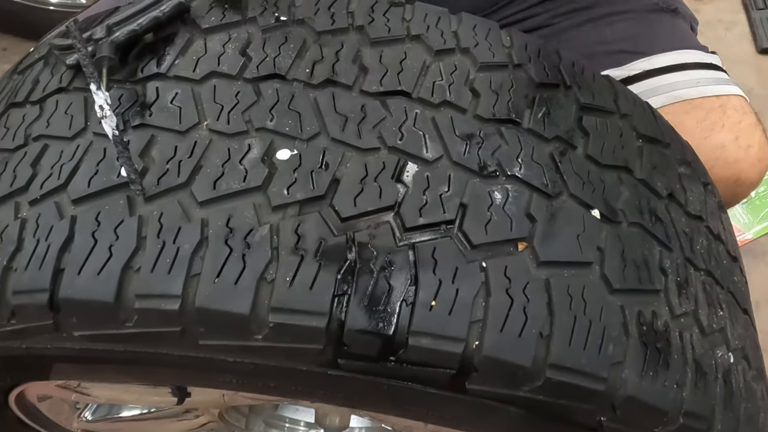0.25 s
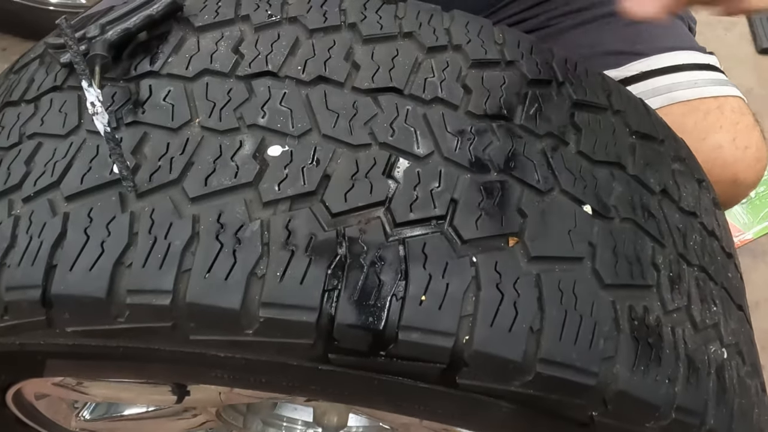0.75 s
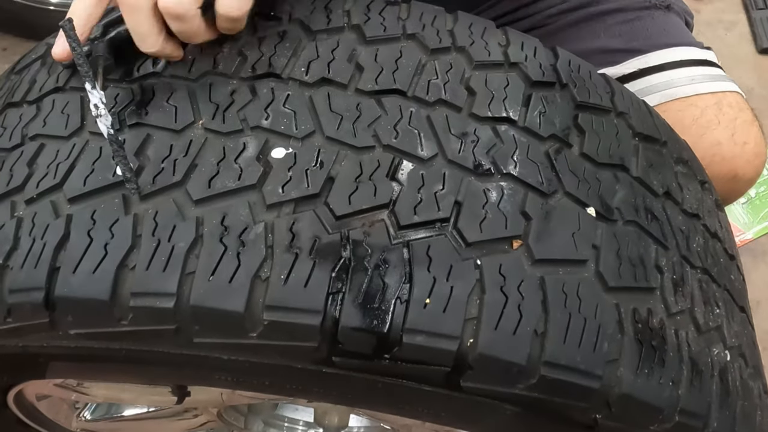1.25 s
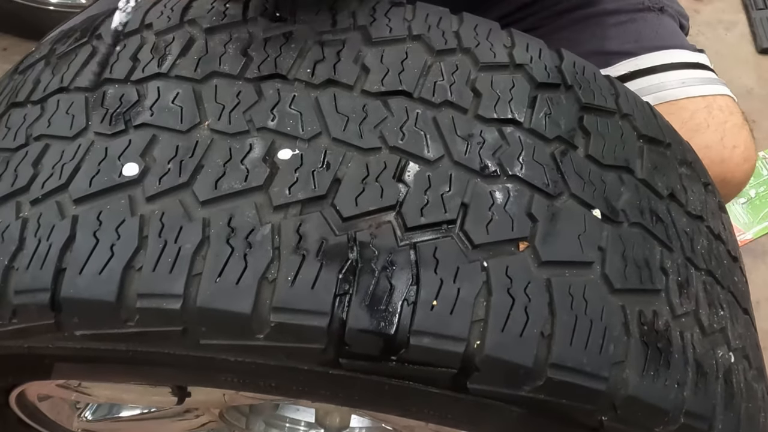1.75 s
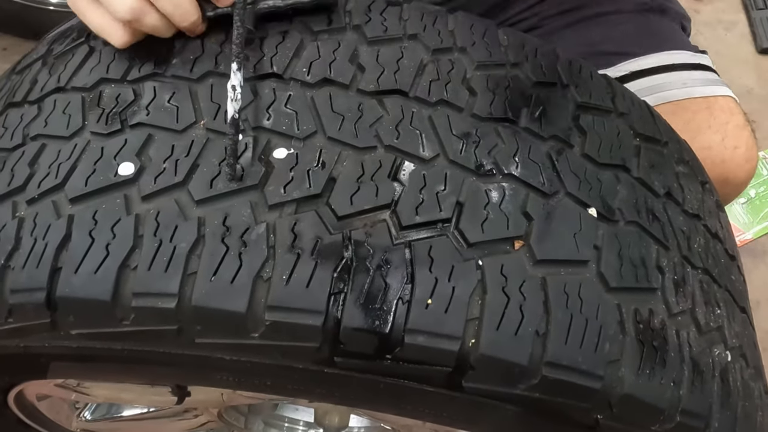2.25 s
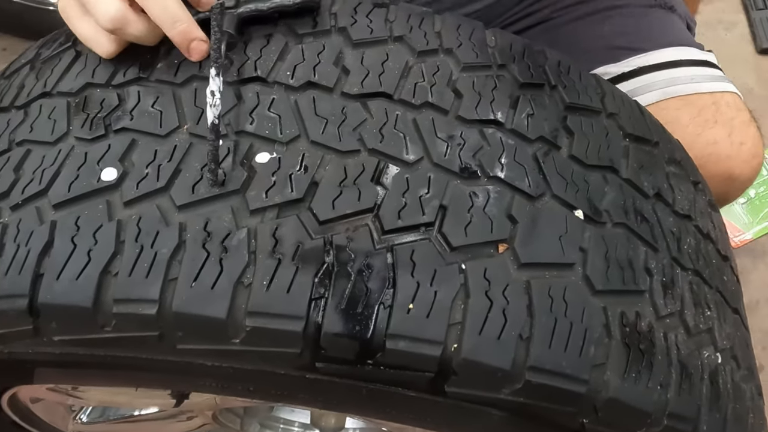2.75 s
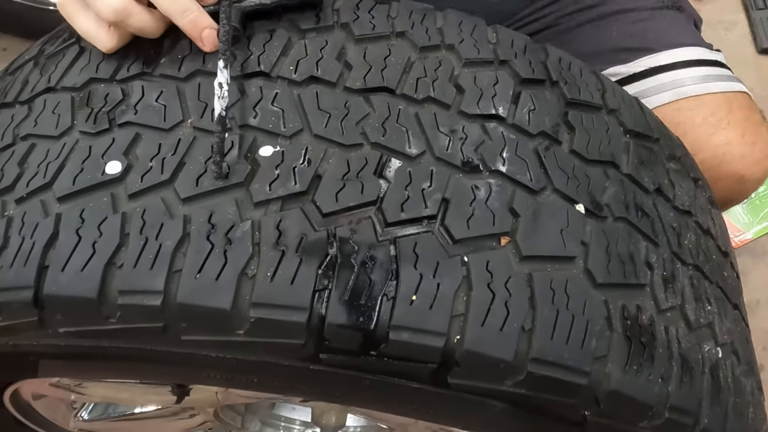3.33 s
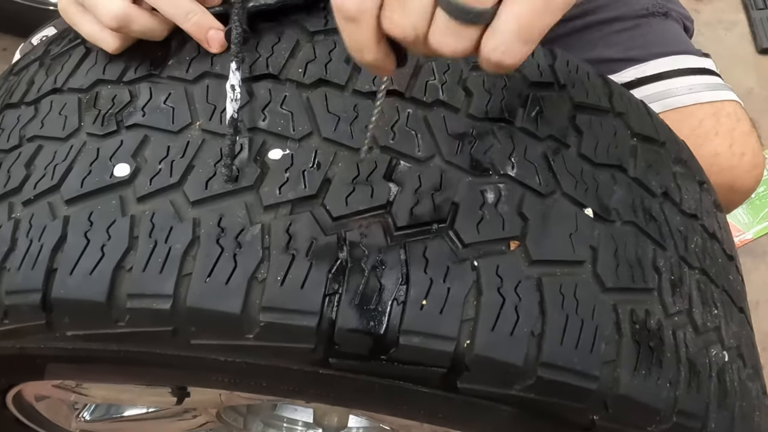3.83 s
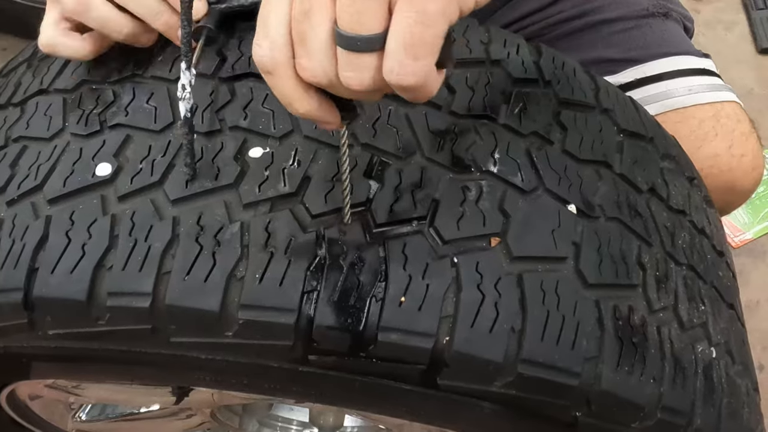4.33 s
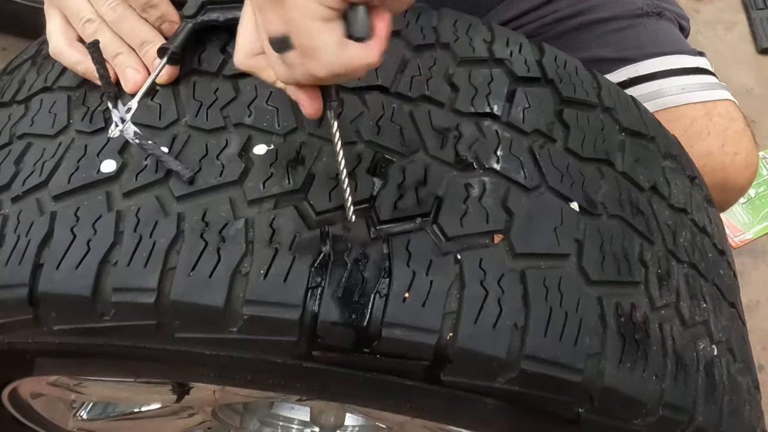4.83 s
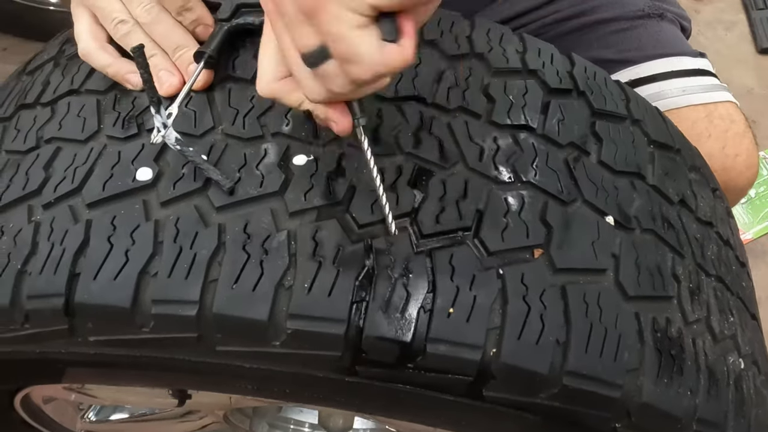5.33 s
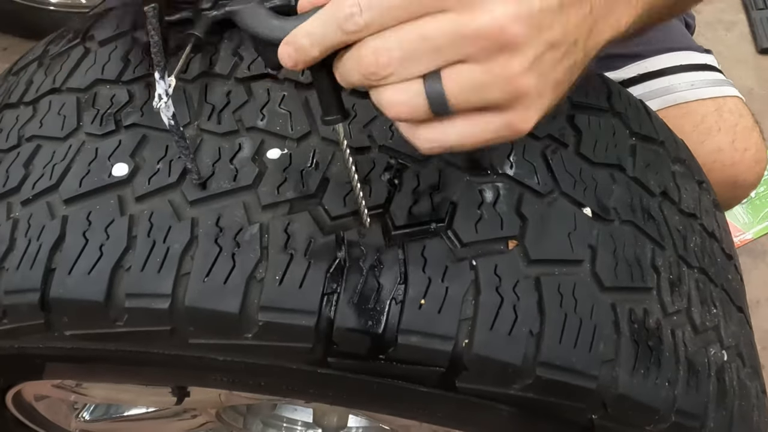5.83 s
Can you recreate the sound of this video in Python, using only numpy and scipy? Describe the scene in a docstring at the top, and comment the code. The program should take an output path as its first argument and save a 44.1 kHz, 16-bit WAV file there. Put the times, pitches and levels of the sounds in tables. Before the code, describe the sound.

Close to the microphone outdoors, pressurised air pours from a hole in a tyre as a strong bright hiss, its colour sweeping as hands move near. A tool lands with a hard double knock early on. Later the jet buffets and swells, then a reamer plugs it abruptly. Faint creaking, dull ticks and short spurts of leaking air follow over a light breeze.

```python
"""Outdoors, close to the microphone: air hisses out of a puncture in a car tyre.
The jet is coloured noise; a hand over it sweeps cancelled and reinforced bands, with eddies and thumps.
A tool is put down with a knock: struck decaying modes, a rattle and a short dull tail.
A reamer splits the jet, chokes it, ticks and creaks in the rubber, and lets air past in noise spurts.
"""
import sys
import numpy as np
from scipy import signal
from scipy.fft import rfft, irfft
from scipy.io import wavfile
from scipy.ndimage import map_coordinates

SR = 44100
rng = np.random.default_rng(int(sys.argv[2]) if len(sys.argv) > 2 else 0)


def bounce(signal):
    """Save signal as a 16-bit WAV file at the path given by the first command-line argument."""
    frames = np.transpose(np.atleast_2d(signal))
    limited = np.clip(frames, -1, 1)
    pcm = np.round(limited * 32767).astype(np.int16)
    wavfile.write(sys.argv[1], SR, pcm)


N = 268392

# open jet before gusts and choke:
# (time [s], hiss in 4-10 kHz [dB], 10.5-15.5 kHz re hiss [dB], 1.8-3.6 kHz re hiss [dB])
JET_LEVELS = [(0, -24.5, -2.5, -13.2), (0.35, -25.5, -1.5, -9), (0.52, -26.1, 0, -9.5),
              (0.73, -25, 3.5, -8.7), (0.98, -27, 0.8, -8), (1.08, -24, -4.5, -11), (1.23, -25, -2.5, -10),
              (1.58, -26, 3, -11.5), (1.68, -29.5, 3.5, -7.5), (1.92, -26.5, 0, -9), (2.14, -28.5, 0, -6),
              (2.24, -24.5, -4.9, -10), (2.36, -28.5, -1.5, -9.5), (2.56, -29.5, -5.8, -12),
              (2.87, -29, -3.2, -12), (3.02, -25.5, 2.3, -10), (3.21, -23.0, -3.5, -14),
              (3.66, -27.5, 5, -7.5), (4.04, -24.5, -2, -9), (4.27, -22, -6.5, -9.4),
              (4.41, -19.7, -8.5, -11.6), (4.58, -25, -11, -11.5)]
# hand over the hole: (time [s], first cancelled pitch [Hz], reflection strength [about 0-1])
HAND_PATH = [(0, 4800, 0.63), (.3, 6760, 0.47), (.64, 7160, 0.82), (.85, 8500, 0.6), (1.17, 11400, 0.07),
             (1.4, 9500, .42), (1.75, 8000, 0.6), (2.05, 8500, 0.56), (2.2, 5700, 0.4), (2.35, 5100, 0.2),
             (2.5, 3750, 0.3), (2.65, 4800, 0), (3.0, 3680, 0.7), (3.11, 4870, 1.1), (3.35, 6570, 0.78),
             (3.68, 7800, 1.2), (3.88, 8940, 0.64), (4.6, 11300, 0.26)]
# bands the reflection cancels or reinforces:
# (centre [multiple of cancelled pitch], width [same], level at strength 1 [dB])
REFLECTION_RIPPLE = [(1.0, 0.12, -10), (1.56, 0.34, 5.5), (2.26, 0.17, -6), (2.78, 0.5, 5.5),
                     (3.33, 0.17, -7), (3.85, .25, -2)]
# air slipping past the reamer: (time [s], length [s], level [dB], share of thin bright jet [0-1])
GAP_SPURTS = [(4.852, 0.026, -37, 0.5), (4.904, 0.083, -32.5, 0.17), (5.015, 0.12, -27.5, .55),
              (5.133, .11, -30, 0.1), (5.264, 0.12, -25.5, 0.53), (5.365, 0.086, -37, 0.1),
              (5.507, .17, -24, 1), (5.654, 0.037, -28.5, 0.4), (5.834, 0.022, -30, 0),
              (5.931, .042, -26.5, 0.15), (5.995, 0.019, -23.5, .25)]
# deflected jet buffeting the microphone: (time [s], length [s], level [dB])
MIC_GUSTS = [(0.616, 0.083, -38.5), (2.227, 0.04, -45), (3.382, 0.13, -39), (4.071, 0.06, -25),
             (4.17, 0.085, -33.5), (4.347, 0.089, -35), (4.462, 0.043, -42)]
# tool landing and bouncing: (time [s], level [dB])
TOOL_KNOCKS = [(.8447, -10.5), (.8540, -13)]
# tool ring: (frequency [Hz], mean level re knock [dB], t60 [s])
TOOL_RING = [(118, -28, 0.38), (426, -14, 0.044), (508, -9, 0.076), (790, -16, 0.069), (1040, -25, 0.082),
             (1293, -18, 0.053), (1600, -4, 0.021), (2060, -6, 0.011), (2580, -8, 0.014), (3070, -9, 0.019),
             (4230, -10, 0.011)]
# reamer against rubber: (time [s], impulse level before softening [dB], pitch [Hz])
RUBBER_TICKS = [(4.423, -21, 1010), (5.3277, -26, 269), (5.408, -28, 910), (5.47, -33, 850),
                (5.768, -33, 1400)]
# stick-slip of rubber on the reamer: (time [s], level [dB])
CREAK_LEVEL = [(4.58, -53), (4.72, -51), (4.77, -44.5), (4.83, -44), (4.87, -48), (4.94, -61), (5.1, -69)]
# creak resonances: (frequency [Hz], half the width of each of two resonators in series [Hz], level [dB])
CREAK_RESONANCES = [(1253, 56, -1), (1345, 34, 0), (1590, 72, -8), (3000, 190, -7), (3200, 130, -10)]
# relative spectra of the free and the split jet: (frequency [Hz], density [dB per Hz])
FREE_JET_COLOUR = [(300, -30), (700, -15.5), (1100, -12), (1800, -7), (2900, -2.5), (5000, -4), (7000, -2),
                   (10400, -3.7), (13600, -7), (15000, -5.5), (15900, -18)]
SPLIT_JET_COLOUR = [(300, -23), (700, -17), (1600, -14.5), (2500, -7.5), (3400, -2), (4200, -5.5),
                    (5200, 0), (5900, -2.5), (6900, 2.5), (8600, 2), (10000, -6.5), (12000, -10.5),
                    (14000, -14), (15000, -9), (15900, -29)]
# relative spectra of air through a wide and a thin gap: (frequency [Hz], density [dB per Hz])
WIDE_GAP_COLOUR = [(400, -26), (900, -16), (1500, -12), (2400, -6), (3400, -3), (4500, -3), (5500, -2),
                   (6900, -1), (9000, -3.5), (10800, -8), (13000, -8.5), (15900, -10.5)]
THIN_GAP_COLOUR = [(500, -50), (1400, -28), (2200, -15), (3500, -16), (5000, -7), (6200, -5), (7500, 2),
                   (9500, 2.5), (11000, 1.5), (14000, -5), (15900, -13)]
# relative spectra of eddies, gusts, outdoor background, breeze: (frequency [Hz], density [dB per Hz])
TURBULENCE_COLOUR = [(40, -4), (130, -1.5), (300, -2), (650, -3.5), (1000, -3.5), (2000, -8.5), (6000, -64)]
BUFFET_COLOUR = [(20, -5), (60, 5), (130, 4), (260, 6), (450, -1.5), (800, -1), (1600, -7), (4000, -34)]
OUTDOORS_COLOUR = [(20, -11), (100, 2.5), (200, -12.5), (500, -29), (1300, -11), (2000, -13), (10000, -16),
                   (16000, -29)]
WIND_COLOUR = [(12, 3), (22, 2.5), (55, 5), (90, -1.5), (170, -3), (500, -61)]
# breeze on the microphone: (time [s], level before BREEZE_GAIN_DB [dB])
WIND_LEVEL = [(0.0, -58), (0.41, -46.5), (1.12, -53.5), (3.98, -56.5), (4.12, -40), (4.15, -46),
              (5.0, -57.5), (5.27, -51), (6.09, -49)]
# short echoes from tread and hands: (mean delay [s], gain [linear])
TREAD_HAND_ECHOES = [(.00155, .13), (.0027, -0.11), (.0046, 0.031), (.0083, .09), (.019, 0.09)]
# reamer entering the jet: (time [s], share of the jet it splits [0-1])
REAMER_SPLIT = [(3.35, 0), (3.65, 0.73), (4.05, 0.6), (4.08, 0.6), (4.4, .9), (4.7, 0)]
# air seeping along the shaft: (time [s], level [dB])
SHAFT_SEEP = [(4.84, -68), (4.87, -39), (5.0, -50), (5.45, -49), (5.485, -35), (5.52, -32.5), (5.7, -32.5),
              (5.82, -34.5), (5.85, -31.5), (6.09, -31)]
# low rustle as the reamer is worked in: (time [s], level [dB])
REAMER_RUSTLE = [(4.5, -68), (4.6, -47.5), (4.86, -48.5), (5.09, -53.5), (6.09, -52.5)]
# reamer snapping deeper: (pitch [Hz], impulse level before softening [dB])
SNAP_PITCHES = [(353, -32), (940, -22.5), (1900, -18)]

TIME = np.arange(N) / SR
FRAME = 512   # samples
FREQS, FRAME_TIMES, _ = signal.stft(TIME, SR, nperseg=FRAME)
CUTOFF_HZ = 15950
OUTDOORS_DB, BREEZE_GAIN_DB = -56.5, -0.5
# plugging the hole: quick drop, then a steady fall; the body fades slower than the treble
CHOKE_S, CHOKE_TAKES_S, CHOKE_DB = 4.588, 0.028, 10.5
SEAL_DB_PER_S, SEAL_DULLS_DB_PER_S = 125, 48
GUST_RISE, GUST_FALL = .3, 0.36   # shares of a gust's length
GUST_HISS_DB = 28   # added to the gust level: extra hiss re the jet's own
ROAR_GAIN_DB, ROAR_FOLLOWS_BODY = -14, 0.55   # roar re jet; 0 follows its hiss, 1 its body
RATTLE_GAP_S, RATTLE_DB, KNOCK_TAIL_DB = .0062, -26.5, -22
SEEP_THIN_SHARE = 0.23
SPURT_RISE, SPURT_FALL = 0.33, .5   # shares of a spurt's length
SNAP_S, DIP_S, DIP_DB = 5.491, 0.014, -23   # dip length at half its depth in dB


def from_db(db):
    """Decibels to gain."""
    return 10 ** (np.asarray(db) / 20)


def rms_one(x):
    """Scale to unit power."""
    return x / np.sqrt(np.mean(x ** 2) + 1e-20)


def in_time(rows, times=TIME):
    """Each column of a curve, joined by straight lines."""
    s, *columns = np.transpose(rows)
    return [np.interp(times, s, c) for c in columns]


def at_hz(points, hz):
    """Read a spectrum on a log-frequency axis."""
    f, db = np.transpose(points)
    return np.interp(np.log(np.maximum(hz, 1)), np.log(f), db)


def drift(rate_hz):
    """Slow random drift of unit rms: white noise through two equal one-pole low-passes."""
    r = np.exp(-2 * np.pi * rate_hz / SR)
    slow = signal.lfilter([1], [1, -2 * r, r * r], rng.standard_normal(N + SR))
    return rms_one(slow[SR:])   # drop the settling second


def noise(spectrum):
    """Steady noise of a given colour and unit power."""
    gain = from_db(at_hz(spectrum, np.fft.rfftfreq(N, 1 / SR)))
    return rms_one(irfft(rfft(rng.standard_normal(N)) * gain, N))


def swell(start_s, length_s, db, rise, fall):
    """Gain that opens abruptly, rounds off and closes; rise and fall are shares of its length."""
    along = (TIME - start_s) / length_s
    ramp = np.clip(np.minimum(along / rise, (1 - along) / fall), 0, 1)
    return from_db(db) * np.sin(np.pi / 2 * ramp)


def ring(clicks, hz, t60_s):
    """Two-pole mode: a unit click sets off a decaying sine of initial height one."""
    r = np.exp(-np.log(1000) / (t60_s * SR))
    w = 2 * np.pi * hz / SR
    return signal.lfilter([0, np.sin(w)], [1, -2 * r * np.cos(w), r * r], clicks + 1e-18)


def resonate(x, hz, width_hz):
    """Two-pole resonance with unit gain at its top."""
    r = np.exp(-np.pi * width_hz / SR)
    top = np.array([1, 0, -1]) * (1 - r * r) / 2
    return signal.lfilter(top, [1, -2 * r * np.cos(2 * np.pi * hz / SR), r * r], x + 1e-18)


def clicks_at(times_s, heights):
    """Single-sample impulses."""
    out = np.zeros(N)
    out[np.round(np.asarray(times_s) * SR).astype(int)] = heights
    return out


def band_db(colour_db, low_hz, high_hz):
    """Level in one band of unit noise given this colour."""
    inside = (FREQS > low_hz) & (FREQS < high_hz)
    return 10 * np.log10(np.sum(from_db(colour_db[inside]) ** 2, axis=0) / len(FREQS))


def gusts():
    """Gain of the air thrown at the microphone."""
    return sum(swell(*row, GUST_RISE, GUST_FALL) for row in MIC_GUSTS)


def flow(times):
    """Hiss, treble and body of the jet in dB: gusts lift it, the reamer chokes and seals it."""
    hiss_db, treble_db, body_db = in_time(JET_LEVELS, times)
    plugged_s = np.maximum(times - CHOKE_S, 0)
    sealing_s = np.maximum(plugged_s - CHOKE_TAKES_S, 0)
    choke_db = CHOKE_DB * np.minimum(plugged_s / CHOKE_TAKES_S, 1) + SEAL_DB_PER_S * sealing_s
    gust_hiss = from_db(GUST_HISS_DB) * np.interp(times, TIME, gusts())
    lift_db = 10 * np.log10(1 + gust_hiss ** 2)
    return hiss_db + lift_db - choke_db, treble_db, body_db + SEAL_DULLS_DB_PER_S * sealing_s


def jet(flutter_db=0.48, grain_db=0.3, hand_hz=8000):
    """Open jet: the reamer splits it; its reflection off the hand cancels and reinforces gliding bands."""
    hiss_db, treble_db, body_db = flow(FRAME_TIMES)
    cancelled_hz, reflection = in_time(HAND_PATH, FRAME_TIMES)
    split, = in_time(REAMER_SPLIT, FRAME_TIMES)
    hz = FREQS[:, None]
    colour = (1 - split) * at_hz(FREE_JET_COLOUR, hz) + split * at_hz(SPLIT_JET_COLOUR, hz)
    reflection = reflection * (hz / hand_hz) ** 0.4   # a hand throws back short waves best
    for multiple, width, db in REFLECTION_RIPPLE:
        offset = (hz / cancelled_hz - multiple) / width
        colour = colour + reflection * db * np.exp(-.5 * offset ** 2)
    colour = colour - band_db(colour, 4000, 10000)
    # a slope tips the treble, a shelf the body
    treble = (treble_db - band_db(colour, 10500, 15500)) * np.maximum(hz - 9000, 0) / 4000
    body = (body_db - band_db(colour, 1800, 3600)) * np.interp(hz, [3000, 5000], [1, 0])
    eddies = signal.stft(rng.standard_normal(N), SR, nperseg=FRAME)[2]
    shaped = eddies * from_db(colour + treble + body + hiss_db)
    air = signal.istft(shaped, SR, nperseg=FRAME)[1][:N]
    return air * from_db(flutter_db * drift(19) + grain_db * drift(280))


def surroundings(air, sway_s=9.9e-5, smallest_hz=3000):
    """Small surfaces throw back mainly short waves; drifting paths lay a fine ripple over the hiss."""
    high_pass = signal.butter(1, smallest_hz, "high", fs=SR, output="sos")
    short_waves = signal.sosfilt(high_pass, air)
    out = air
    for delay_s, gain in TREAD_HAND_ECHOES:
        path_s = delay_s + sway_s * drift(0.7)
        out = out + gain * map_coordinates(short_waves, [(TIME - path_s) * SR], order=3)
    return out


def turbulence(lumps_db=3.0, gust_lumps_db=2.5):
    """Large eddies roar with the flow and give way to a rustle; those thrown at the microphone thump."""
    hiss_db, _, body_db = flow(TIME)
    roar_db = hiss_db + ROAR_FOLLOWS_BODY * body_db + ROAR_GAIN_DB
    level = np.hypot(from_db(roar_db), from_db(in_time(REAMER_RUSTLE)[0]))
    roar = level * from_db(lumps_db * drift(135)) * noise(TURBULENCE_COLOUR)
    buffet = rms_one(noise(BUFFET_COLOUR) * from_db(gust_lumps_db * drift(120)))
    return roar + gusts() * buffet


def outdoors():
    """Steady background as coloured noise."""
    return from_db(OUTDOORS_DB) * noise(OUTDOORS_COLOUR)


def breeze(lumps_db=1.5):
    """Low wind noise on the microphone, uneven in level."""
    level_db = in_time(WIND_LEVEL)[0] + BREEZE_GAIN_DB + lumps_db * drift(8)
    return from_db(level_db) * noise(WIND_COLOUR)


def knock(scatter_db=3.0, tail_t60_s=.24, rattle_count=5):
    """Each bounce strikes the tool's modes differently, then it rattles; a short dull tail follows."""
    last_s = TOOL_KNOCKS[-1][0]
    jitters = rng.uniform(-.2, 0.22, rattle_count)   # in gaps
    rattle = [(last_s + RATTLE_GAP_S * (k + 1 + jitter), RATTLE_DB) for k, jitter in enumerate(jitters)]
    times, level_db = np.transpose(list(TOOL_KNOCKS) + rattle)
    chance = rng.standard_normal((len(times), len(TOOL_RING)))
    out = np.zeros(N)
    for k, (hz, db, t60_s) in enumerate(TOOL_RING):
        strikes = clicks_at(times, from_db(level_db + db + scatter_db * chance[:, k]))
        out += (-1) ** k * ring(strikes, hz, t60_s)
    age_s = np.maximum(TIME - times[0], 0)
    tail = np.minimum(age_s / 0.011, 1) * np.exp(-np.log(1000) * age_s / tail_t60_s)
    # (frequency [Hz], density [dB per Hz])
    dull = noise([(60, -17), (130, 1), (280, -6), (450, -1), (1500, 0), (3000, -14), (8000, -45)])
    return out + from_db(KNOCK_TAIL_DB) * tail * dull


def ticks(cycles=5.3, softness=3.7):
    """Rubber rounds each tick, and the snap, by a low-pass and damps it within a few cycles."""
    snap = [(SNAP_S, db, hz) for hz, db in SNAP_PITCHES]
    out = np.zeros(N)
    for s, db, hz in list(RUBBER_TICKS) + snap:
        low_pass = signal.butter(2, softness * hz, fs=SR, output="sos")
        push = signal.sosfilt(low_pass, clicks_at([s], from_db(db)) + 1e-18)
        out += ring(push, hz, cycles / hz)
    return out


def creak(slips_per_s=95, unevenness=0.44, rasp=0.77):
    """Stick-slip: uneven slips, each a decaying burst of friction noise, ring the reamer in the rubber."""
    phase = np.cumsum(slips_per_s * (1 + unevenness * drift(40))) / SR % 1
    friction = np.exp(-phase / rasp) * rng.standard_normal(N)
    voice = np.zeros(N)
    for hz, half_width_hz, db in CREAK_RESONANCES:
        once = resonate(friction, hz, 2 * half_width_hz)
        voice += from_db(db) * rms_one(resonate(once, hz, 2 * half_width_hz))
    active = (TIME > CREAK_LEVEL[0][0]) & (TIME < CREAK_LEVEL[-1][0])
    return rms_one(voice) * from_db(in_time(CREAK_LEVEL)[0]) * active


def spurts(flutter_db=1.1, grain_db=1.0):
    """Air seeps along the reamer, and each twist opens a gap; a thin gap hisses brighter than a wide one."""
    seep = from_db(in_time(SHAFT_SEEP)[0]) * (TIME > SHAFT_SEEP[0][0])
    gaps = [(seep, SEEP_THIN_SHARE)]
    for s, length_s, db, share in GAP_SPURTS:
        gaps.append((swell(s, length_s, db, SPURT_RISE, SPURT_FALL), share))
    # shares divide power
    thin = sum(np.clip(share, 0, 1) * level ** 2 for level, share in gaps)
    wide = sum(np.clip(1 - share, 0, 1) * level ** 2 for level, share in gaps)
    air = np.sqrt(thin) * noise(THIN_GAP_COLOUR) + np.sqrt(wide) * noise(WIDE_GAP_COLOUR)
    return air * from_db(flutter_db * drift(40) + grain_db * drift(300))


def dip(edge_s=0.0028):
    """Gain that dips briefly at the snap."""
    inside_s = np.minimum(TIME - SNAP_S, SNAP_S + DIP_S + edge_s - TIME)
    return from_db(DIP_DB * np.clip(inside_s / edge_s, 0, 1))


def scene():
    """Sum of all sources, the same in both channels; the dip spares contact sounds and breeze."""
    air = surroundings(jet() + spurts())
    dipped = dip() * (air + turbulence() + outdoors())
    mono = dipped + breeze() + knock() + ticks() + creak()
    return np.array([mono, mono])


def record(dry):
    """Steep elliptic low-pass at the top."""
    return signal.sosfilt(signal.ellip(12, .1, 80, CUTOFF_HZ, fs=SR, output="sos"), dry)


dry = scene()
out = record(dry)
bounce(out)
```